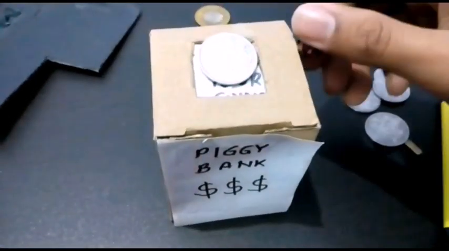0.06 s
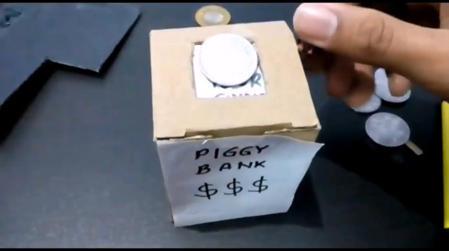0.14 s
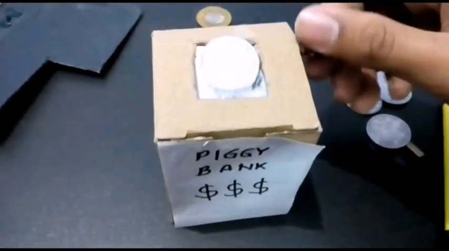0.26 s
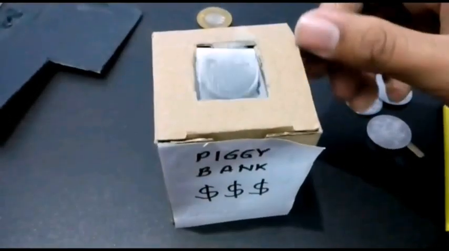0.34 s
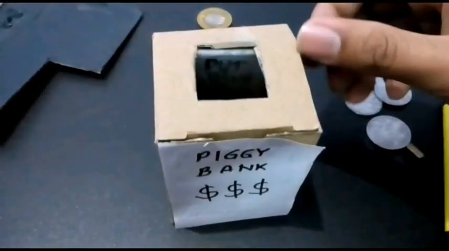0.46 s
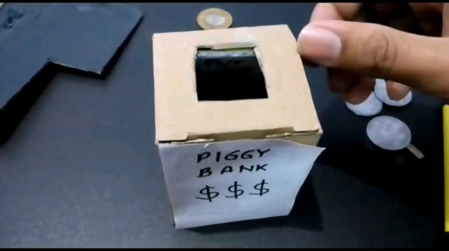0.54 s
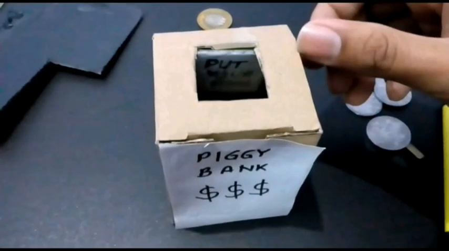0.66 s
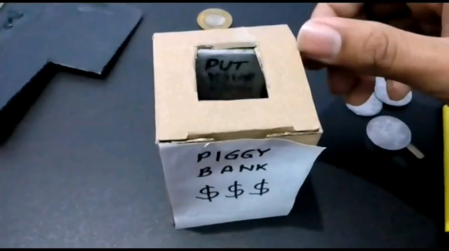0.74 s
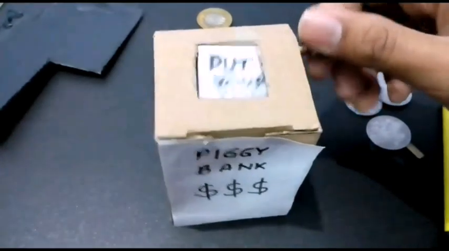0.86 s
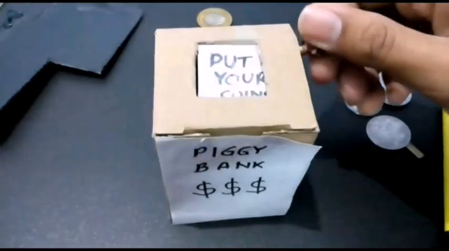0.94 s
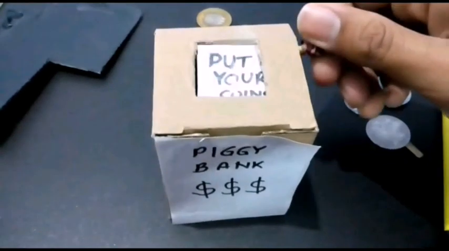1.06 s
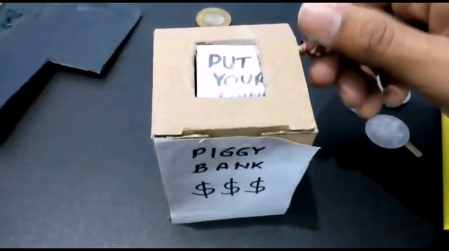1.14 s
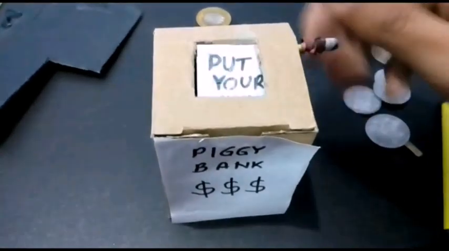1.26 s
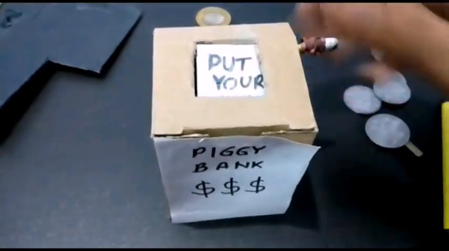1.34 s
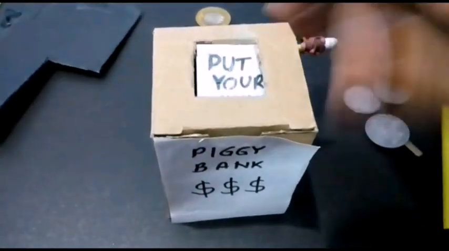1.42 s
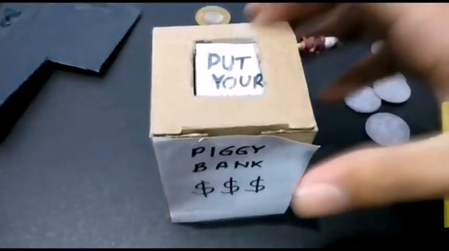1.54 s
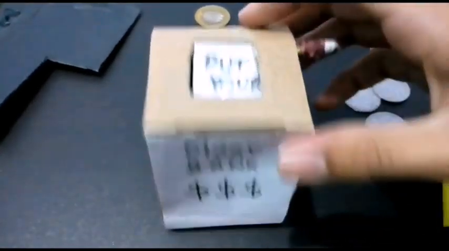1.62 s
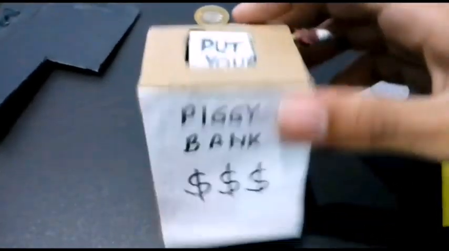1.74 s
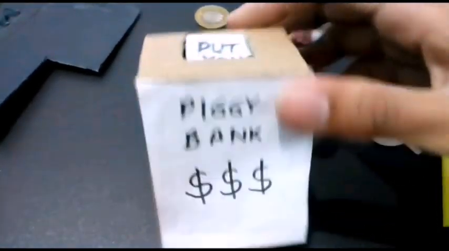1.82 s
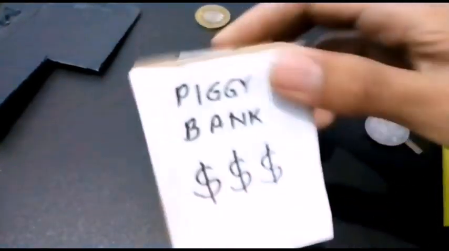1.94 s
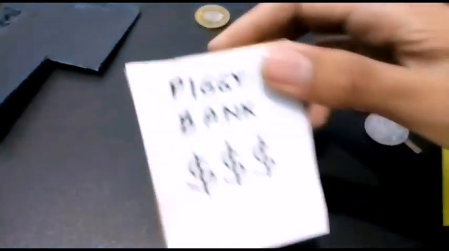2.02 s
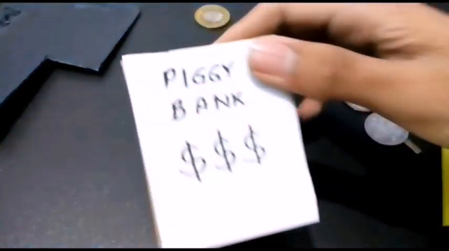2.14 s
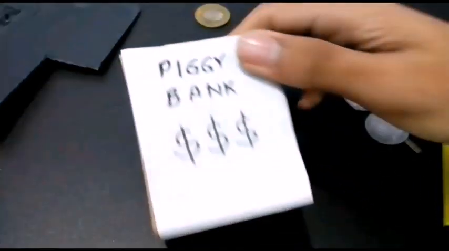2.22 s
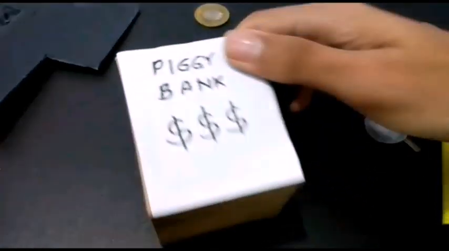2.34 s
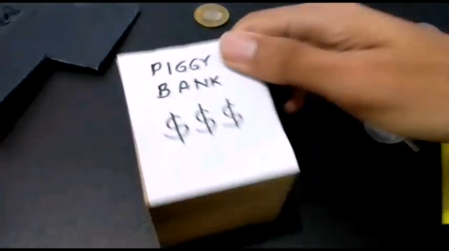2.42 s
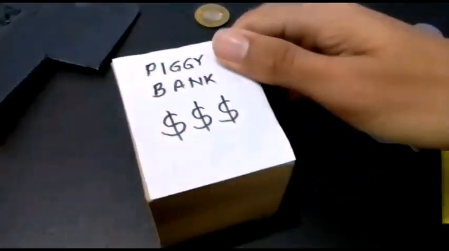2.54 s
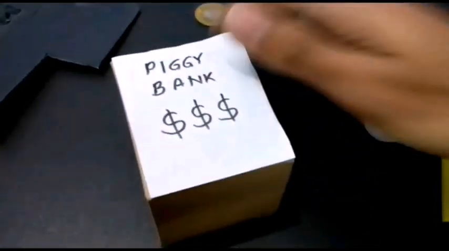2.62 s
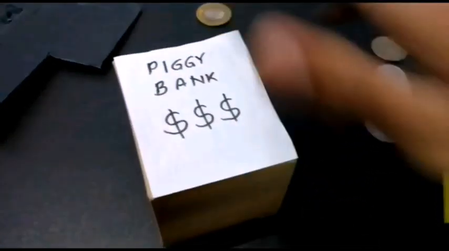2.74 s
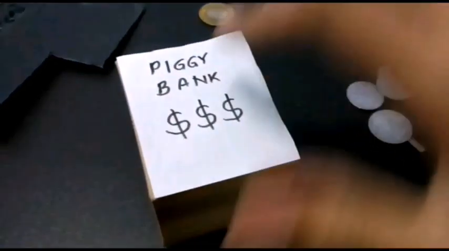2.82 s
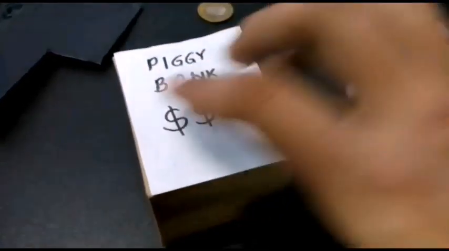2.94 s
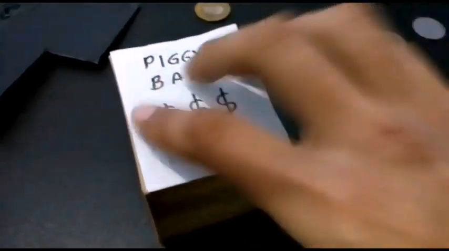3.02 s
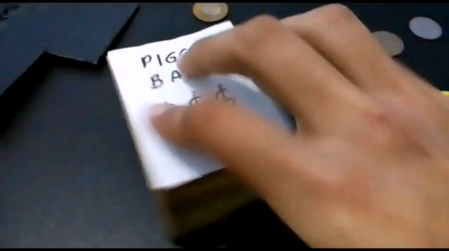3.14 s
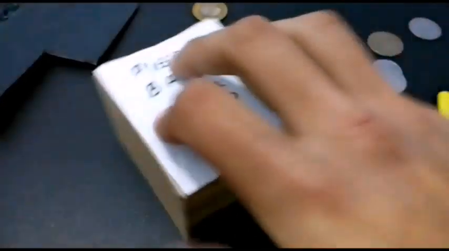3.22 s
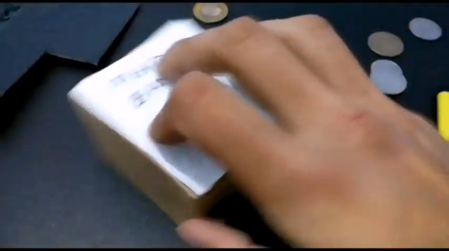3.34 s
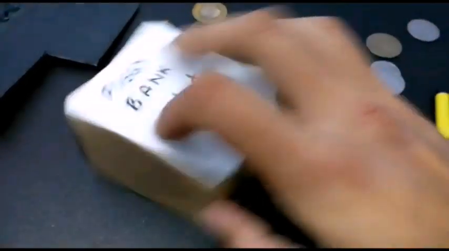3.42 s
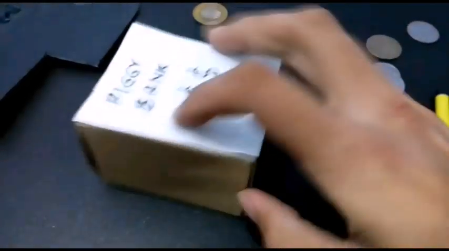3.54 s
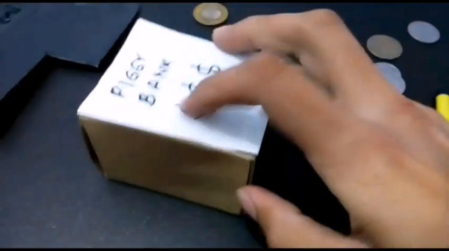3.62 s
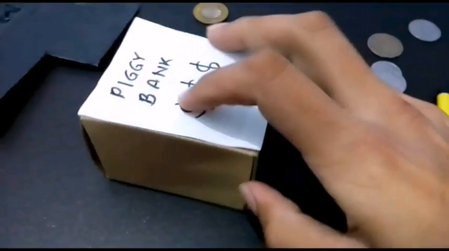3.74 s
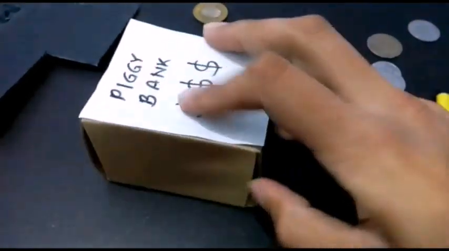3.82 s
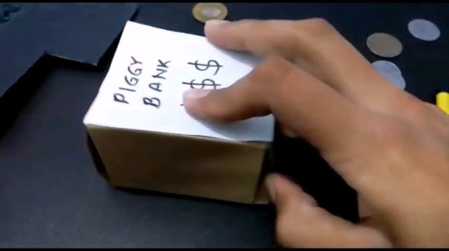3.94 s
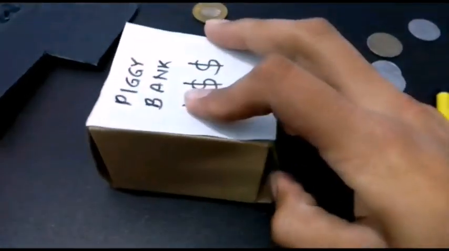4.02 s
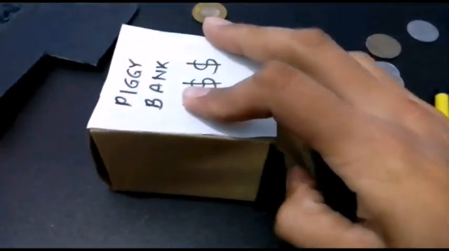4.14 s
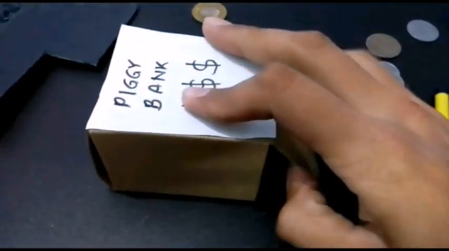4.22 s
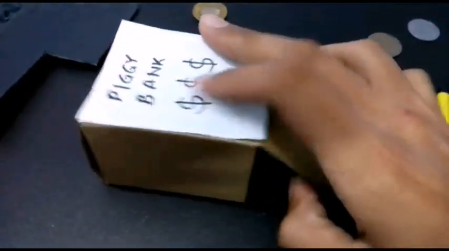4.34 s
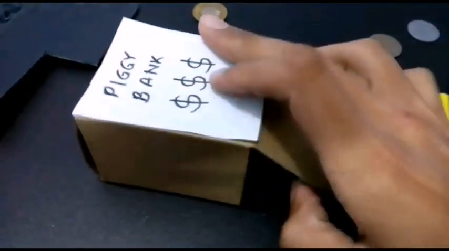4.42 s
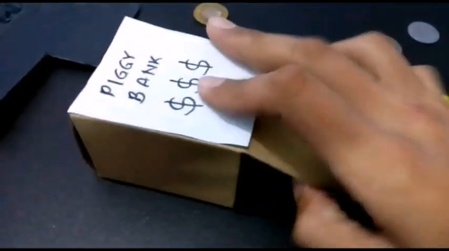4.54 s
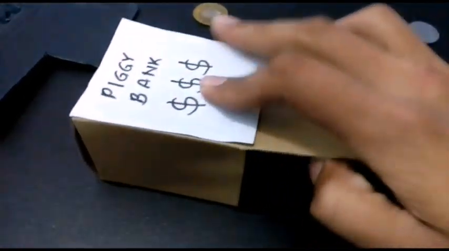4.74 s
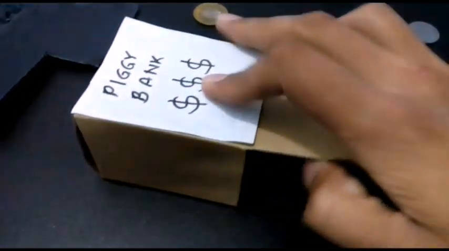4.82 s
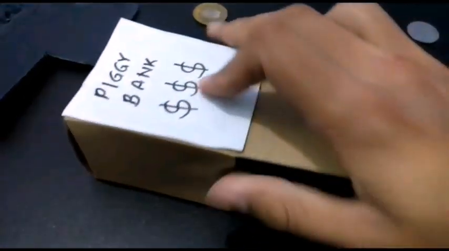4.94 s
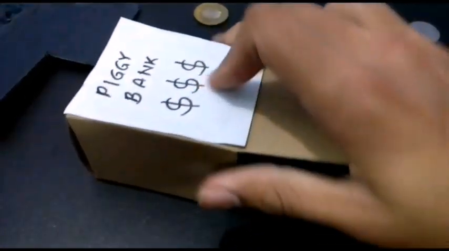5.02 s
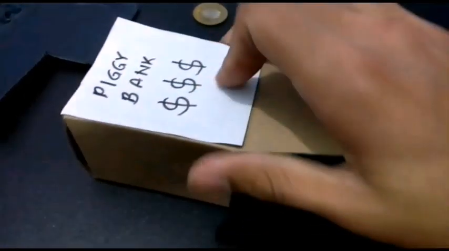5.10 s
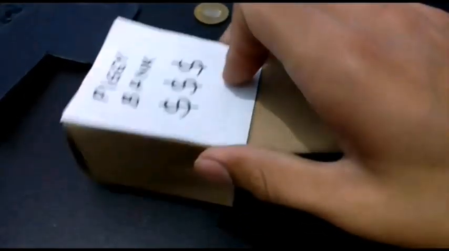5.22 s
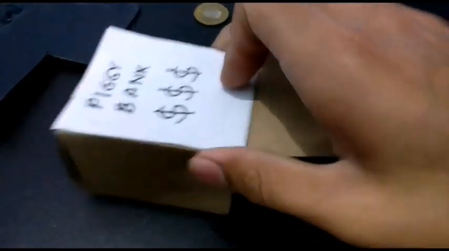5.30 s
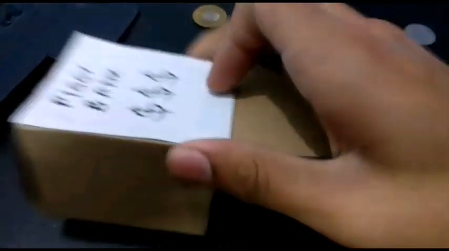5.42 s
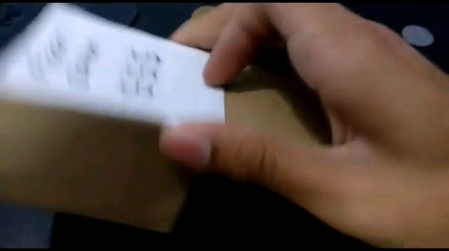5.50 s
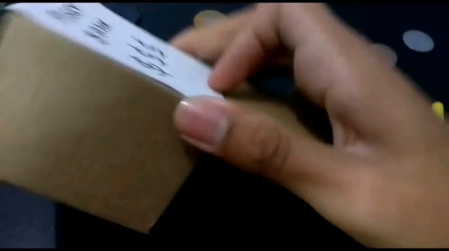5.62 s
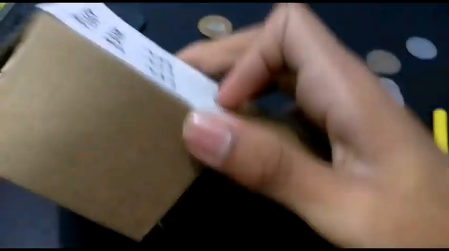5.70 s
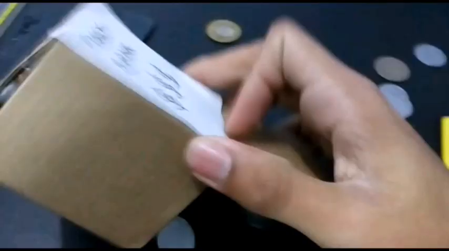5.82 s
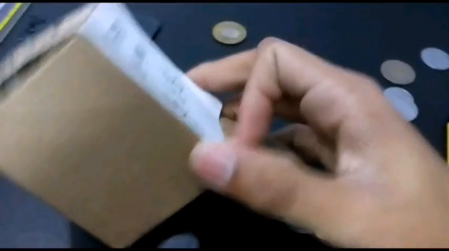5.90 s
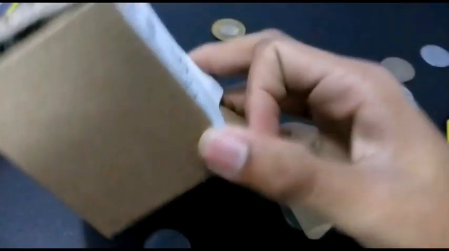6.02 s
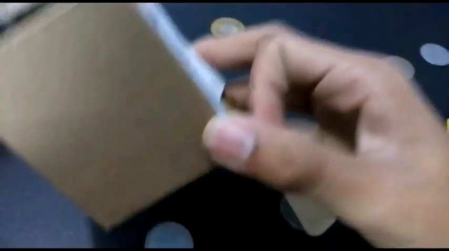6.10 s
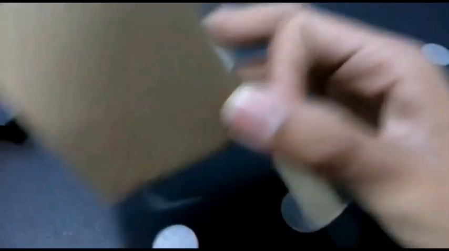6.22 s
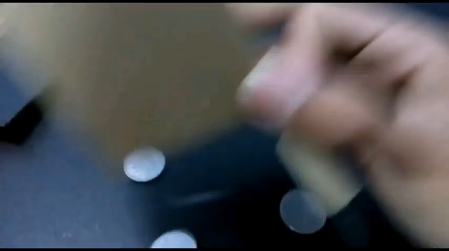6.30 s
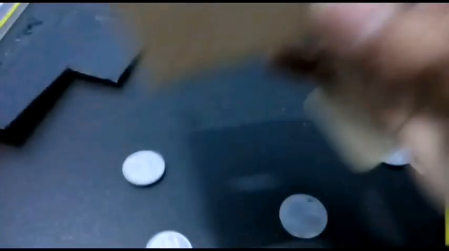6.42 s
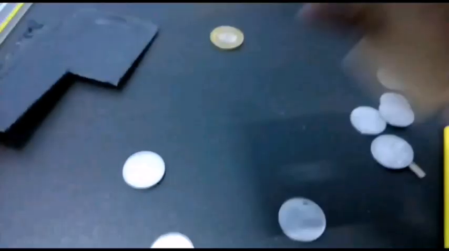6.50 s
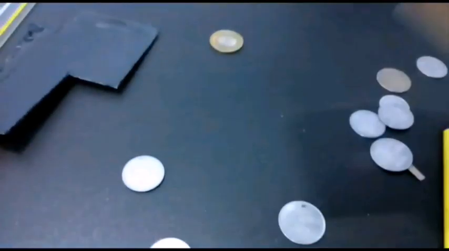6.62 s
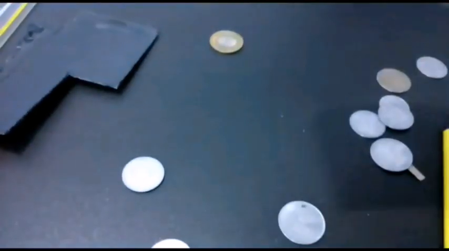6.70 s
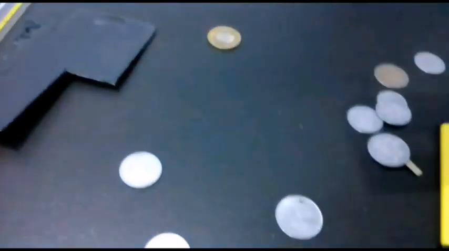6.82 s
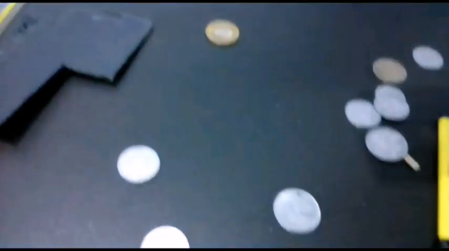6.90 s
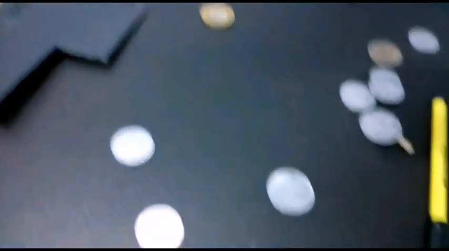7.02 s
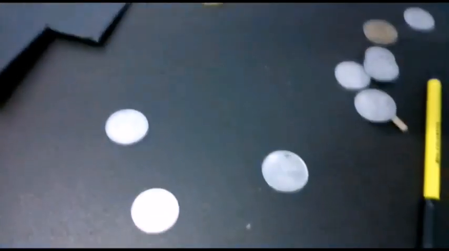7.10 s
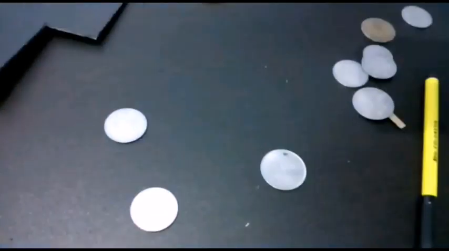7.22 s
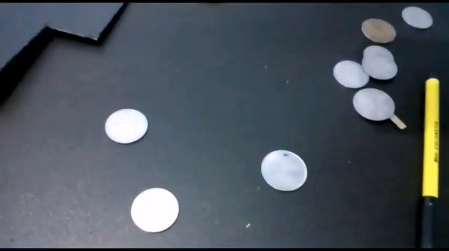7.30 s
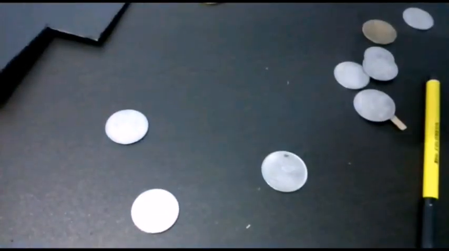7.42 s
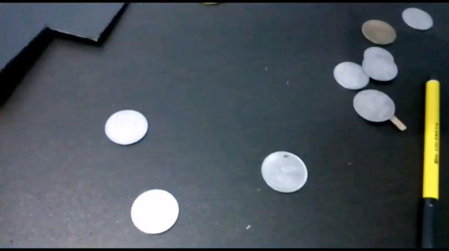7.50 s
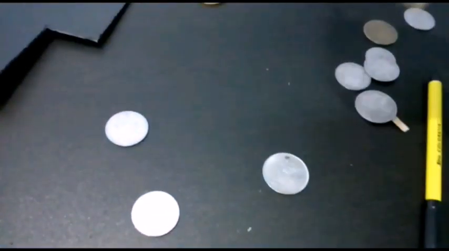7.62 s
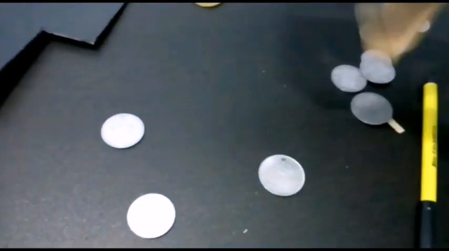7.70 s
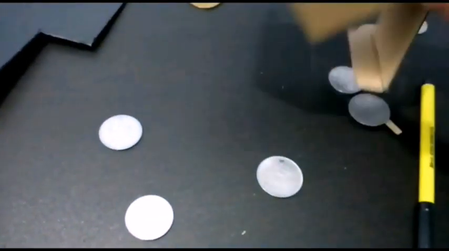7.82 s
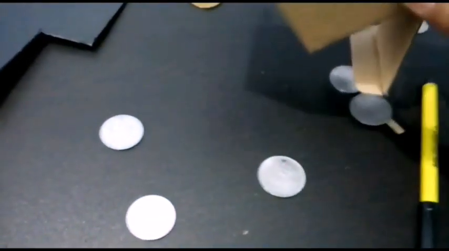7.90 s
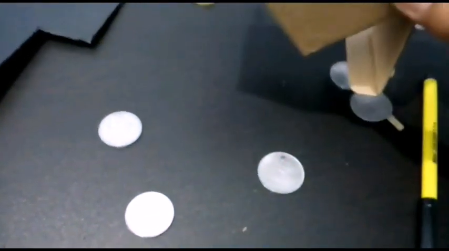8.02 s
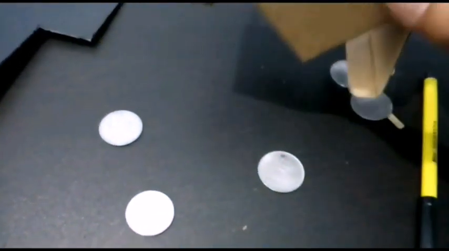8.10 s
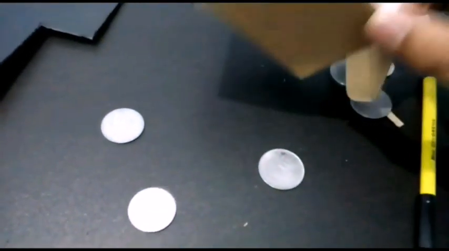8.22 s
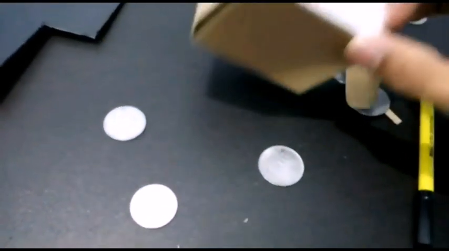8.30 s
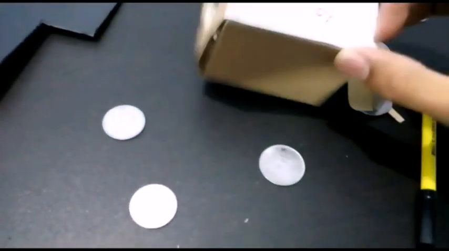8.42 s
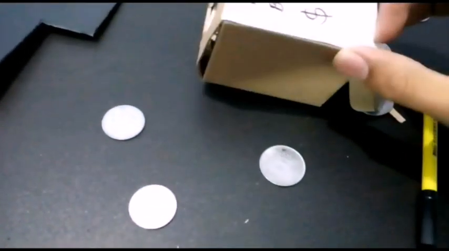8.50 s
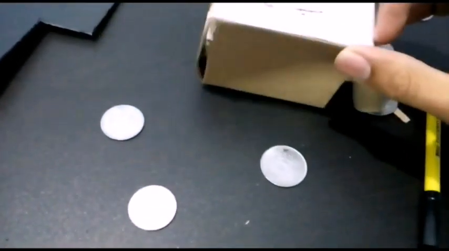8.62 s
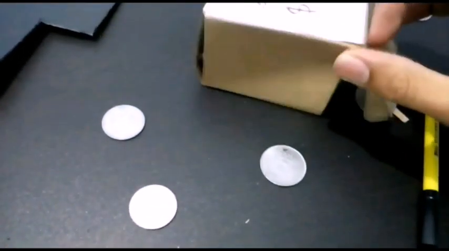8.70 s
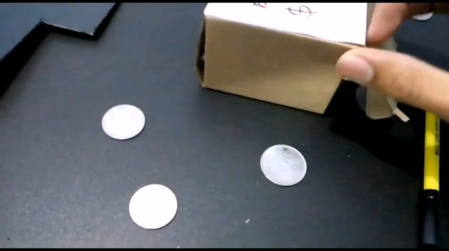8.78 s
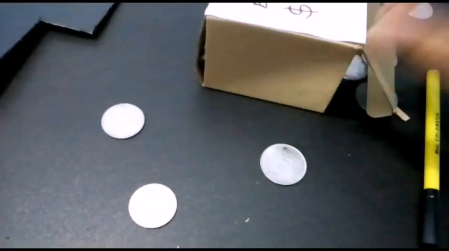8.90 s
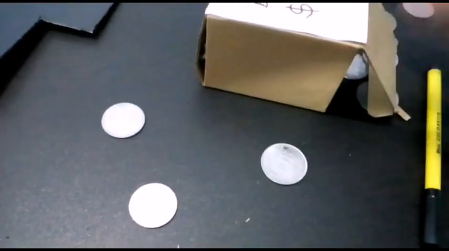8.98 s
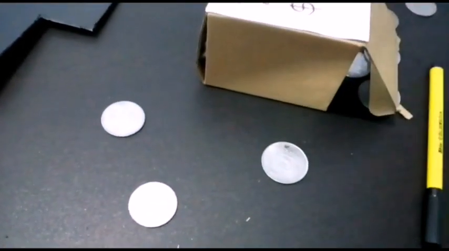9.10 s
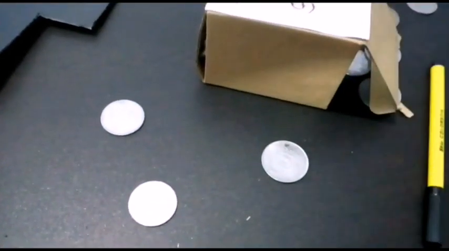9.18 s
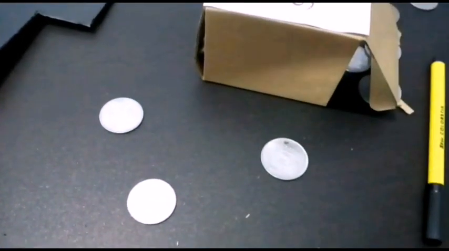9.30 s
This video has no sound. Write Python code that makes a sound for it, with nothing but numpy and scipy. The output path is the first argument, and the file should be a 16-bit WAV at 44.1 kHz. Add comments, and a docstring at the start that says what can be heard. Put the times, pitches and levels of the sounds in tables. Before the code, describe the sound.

Close by in a quiet room with a faint wavering hum, a coin clinks and knocks down into a cardboard box. Fingers rub and bump the box as it turns, rattling the coins inside, and a flap scrapes open. Then the coins fall ringing onto a tabletop, where they roll and wobble to a stop. Last, the box is set down with a hollow tap. Everything sits a little right of center.

```python
"""First a coin drops through a flap into a small cardboard box, knocking the walls and ringing.
Hands lift and tip the box, so the coins tumble inside, then turn and open it, scraping the card.
Near 6 s the coins spill on a hard table, where two wobble faster and faster until they lie flat.
A few last knocks and rubs follow. All along, the quiet room has a low wavering rumble.
The box stands nearer the right microphone."""
import sys
import numpy as np
from scipy import signal
from scipy.fft import rfft, irfft
from scipy.io import wavfile
from scipy.ndimage import uniform_filter1d

SR = 44100
rng = np.random.default_rng(int(sys.argv[2]) if len(sys.argv) > 2 else 0)


def file_out(sig):
    """Save sig as 16-bit WAV at sys.argv[1]."""
    # one column per channel
    cols = np.atleast_2d(sig).T
    # limit, then scale
    lim = np.clip(cols, -1, 1)
    pcm = np.round(lim * 32767).astype(np.int16)
    wavfile.write(sys.argv[1], SR, pcm)


N = 412321

# Tones of the box's walls and the air inside: pitch_hz, width_hz, level_db (narrow tones ring longer)
BOX_TONES = [(740, 21, -10), (1010, 62, -5.5), (1915, 96, 7), (2600, 99, 6.5), (3300, 34, 2.5),
             (3860, 110, -2), (4526, 1800, -8.5), (5600, 190, -24.5), (6400, 49, -19), (7273, 93, -24),
             (8515, 50, -59)]
# Low tones of the whole box on the table: pitch_hz, width_hz, level_db
THUD_TONES = [(190, 40, -3), (260, 35, 0), (350, 60, 0), (450, 40, -4)]
# How much low and high sound a crack holds: pitch_hz, level_db
CRACK_SPECTRUM = [(880, -28.5), (1500, -2.5), (2230, -4), (2970, -2), (5380, -8.5), (8240, -16.5),
                  (14900, -17), (16000, -15.5)]
# Each knock: start_s, level_db, pitch_hz, crack_db, thud_db (the last two add to level_db)
KNOCK_HITS = [(0.612, -48, 2350, 8.5, -30), (0.622, -34, 3700, 8, -22), (0.6335, -15, 1330, -0.5, -33),
              (0.683, -45, 1370, 0, -16.5), (0.695, -18.5, 1200, -2.5, -13), (0.731, -31, 1210, -10, -14),
              (0.774, -33.5, 1360, 7.5, -6.5), (0.812, -33, 1260, 9.5, -9), (1.096, -40.5, 474, -21.5, -31),
              (2.086, -40.5, 1240, 3.5, -58), (2.149, -24.5, 1390, -4, -3), (2.156, -22.5, 1380, 0, -5),
              (2.194, -34, 1120, -21, -18), (2.25, -28, 1660, -9.5, -17), (2.324, -35.5, 1350, -26, -9),
              (2.337, -39, 450, -18, 1), (2.587, -43.5, 1330, -10, -27.5), (2.637, -38.5, 750, -9, -4),
              (2.8, -31, 1037, -17, -13), (2.828, -23.5, 855, 13, -10.5), (2.874, -25.5, 1200, -10, -43.5),
              (2.887, -27, 710, 6, -15), (2.915, -26, 1020, 0, -8), (2.945, -30.5, 1040, -3.5, -14),
              (2.951, -15.5, 1810, 0, -21), (2.98, -23, 1190, -18, -11), (3.008, -17.5, 1960, -8.5, -20),
              (3.034, -24, 1970, -6, -15), (3.254, -37.5, 953, -12.5, -17.5), (3.254, -42, 3070, -11, -42),
              (3.515, -48, 990, -19, -33), (3.955, -47.5, 1000, -12, -30.5), (4, -44.5, 930, -25, -34),
              (4.112, -33, 1010, 11.5, -38), (4.197, -37, 3120, -1, -37.5), (4.215, -35.5, 970, 5.5, -45),
              (4.242, -42, 1070, 13.5, -38), (4.275, -22, 3420, -4, -9), (4.294, -23, 1050, 8, -43),
              (4.416, -42, 990, -9, -27), (4.548, -38.5, 1000, -14, -42), (5.398, -43, 900, 9.5, -22),
              (5.657, -33.5, 1510, -15.5, -31.5), (5.718, -16.5, 1910, -4.5, -31),
              (5.779, -33.5, 457, -14, -17), (5.813, -28, 464, 0, -9), (5.896, -9, 2900, -7.5, -22.5),
              (7.555, -35.5, 2160, 8.5, -52.5), (7.565, -39, 2050, 0, -50), (7.576, -42, 2060, -1, -48),
              (7.582, -48.5, 1215, 13, -48.5), (8.552, -48.5, 2430, 2.5, -38), (8.868, -30, 945, -6, -1),
              (8.877, -25, 1026, -16, -24), (8.893, -24.5, 2200, -20, -10.5), (8.965, -61, 2970, 12, -30)]
def knocks():
    """A short, rough touch shakes one wall and the whole box, with a bright crack and a low thud."""
    t, out = np.arange(SR // 8) / SR, np.zeros((2, N))
    contact_s = 0.0011
    # a coin rocks to rest in the box with eight fading taps
    rocking = [(3.108 + k * 0.017, -47 - 1.6 * k, 1900, -20, -50) for k in range(8)]
    box, crack, thud = resonator(BOX_TONES), tone_filter(CRACK_SPECTRUM), resonator(THUD_TONES)[0]
    for start_s, db, hz, crack_db, thud_db in KNOCK_HITS + rocking:
        direct, indirect = rng.standard_normal((2, len(t))) * t / contact_s * np.exp(-t / contact_s)
        direct[12] += 4.5  # one hard touch near the start
        # the far, left microphone hears the blow partly by other paths
        contact = np.array([0.69 * direct + 0.91 * indirect, direct])
        wall = (1 - np.exp(-t * hz)) * np.exp(-t * hz / 2.1) * np.sin(2 * np.pi * hz * t)
        parts = [(through(contact, wall), -1.5, 3),  # sound, left_db, right_db
                 (through(contact, box), -9 - hz / 250, -5 - hz / 250),
                 (through(contact, crack), crack_db - 7, crack_db + 8.5),
                 (through(contact[[1, 1]], thud), thud_db - 8.5, thud_db + 8.5)]
        for part, left_db, right_db in parts:
            part = part / abs(part).max(1, keepdims=True)
            add(out, start_s, stereo(db + left_db, db + right_db) * part)
    return out


# The tones of a coin: pitch_hz, level_db, ring_s (time to fade by 60 dB)
COIN_TONES = [(7180, -24, 0.044), (8195, -21, 0.029), (9930, -9, 0.035), (9950, -11, 0.097),
              (10530, -6.5, 0.066), (10870, -7, 0.08), (11250, -5, 0.15), (11460, -9.5, 0.096),
              (13700, -15, .04), (14320, -15, .04), (14700, -14, .07), (15230, -7.5, 0.086)]
def coin_ring(weights, ring_share):
    """Where a coin is hit sets how strong each tone is; what it lies on shortens the ring."""
    t = np.arange(SR // 4) / SR
    rise_s, detune = 0.00076, 0.002
    hz, db, ring_s = np.transpose(COIN_TONES)[..., None]
    hz = hz * (1 + detune * rng.standard_normal(hz.shape))  # each blow shifts the tones a little
    fade = gain_of(db - 60 * t / (ring_s * ring_share))
    ring = (weights[..., None] * fade * np.sin(2 * np.pi * hz * t)).sum(-2)
    ring *= 1 - np.exp(-t / rise_s)
    return ring / abs(ring).max()


# Each clink: start_s, level_db, ring_share (1 rings as long as a free coin)
CLINK_HITS = [(0.632, -20.5, 0.4), (0.683, -24.5, 0.33), (0.775, -19.5, 0.4), (0.814, -24.5, 0.19),
              (2.833, -33, 1), (2.952, -29.5, 0.35), (5.905, -21.5, 0.75), (5.9517, -23, 1)]
def clinks():
    """Struck coins ring, each with its own mix of tones."""
    out = np.zeros((2, N))
    for start_s, db, ring_share in CLINK_HITS:
        weights = rng.uniform(0.12, 1, (2, len(COIN_TONES)))
        add(out, start_s, stereo(db - 1.5, db + 8.5) * coin_ring(weights, ring_share))
    return out


# Tones of the table top: pitch_hz, width_hz, level_db
TABLE_TONES = [(449, 57, -1.5), (686.6, 54, -1.5), (1013, 37, -1.5), (1810, 56, -14.5), (2230, 25, -18.5),
               (2430, 160, -9), (3310, 100, -3), (4345, 78, -4), (6600, 188.8, -11.5), (6205, 140, -18),
               (8400, 31, -29)]
# Tones of the patches of table under a coin's rim: pitch_hz, level_db
PATCH_TONES = [(1050, -7), (1850, -10.5), (2750, -7), (3400, -5.5), (4450, -5.5), (5700, -8)]
# The lows and highs of rolling: pitch_hz, level_db
ROLL_SPECTRUM = [(88, -33), (150, -7.5), (303, -39.5), (448, -9), (871, -6.5), (998, -3.5), (2450, 0.5),
                 (3420, -3), (4490, -3.5), (9260, -22), (11300, -15), (16000, -37)]
# How loud the rolling is: time_s, level_db
ROLL_LEVELS = [(5.885, -66.5), (5.898, -30), (6.05, -31.5), (6.15, -38), (6.8, -36.5), (6.99, -38),
               (7.03, -52), (7.15, -76)]
# Landing skids, then the turns of two wobbling rims: time_s, level_db, decay_ms, pitch_hz
RIM_GRINDS = [(5.927, -24.5, 2.2, 3203), (5.942, -23.5, 3.3, 4785), (5.946, -27, 0.92, 4730),
              (5.956, -28, 6.1, 2620), (6.004, -31.5, 1.6, 3400), (6.041, -31, 6.7, 2520),
              (6.057, -28, 4.1, 3360), (6.079, -25, 2.3, 3410), (6.121, -32, 5.2, 3350),
              (6.132, -28.5, 4, 3287), (6.179, -27, 4.9, 2940), (6.201, -26.5, 2.3, 2670),
              (6.212, -33.5, 7.9, 2777), (6.273, -25.5, 5, 3223), (6.341, -27, 4.4, 3410),
              (6.356, -28, 3.1, 4900), (6.407, -30, 6, 3380), (6.434, -24, 2.8, 1750),
              (6.468, -27, 4.6, 2284), (6.506, -28, 2, 3170), (6.518, -29.5, 6, 4446),
              (6.575, -25.5, 4.8, 2936), (6.622, -34, 18, 3390), (6.636, -31, 2.9, 4400),
              (6.673, -28.5, 4, 4450), (6.693, -31, 3.1, 4680), (6.715, -30.5, 3.5, 3370),
              (6.747, -27, 2.6, 1900), (6.76, -26.5, 2.1, 1900), (6.782, -27, 1.7, 3350),
              (6.796, -25.5, 3.3, 3340), (6.829, -31.5, 5.2, 4460), (6.84, -29.5, 2.6, 3466),
              (6.858, -31, 4.1, 4480), (6.875, -29, 3, 4600), (6.886, -27.5, 1.3, 2490),
              (6.908, -28.5, 3, 4410), (6.938, -29, 3.2, 4380), (6.961, -34, 3.3, 2750),
              (6.98, -31, 2.6, 3460)]
def rolling_coins():
    """Coins roll on the table and grind it each time a tilted rim comes round."""
    t = np.arange(2000) / SR - 0.02
    width_hz, spread_db, peak_s = 260, 3.5, 0.002
    pressure, patches = follow([ROLL_LEVELS])[0], np.zeros((2, N))
    slips = friction(per_s=40000, spread_db=0.6)
    for time_s, db, decay_ms, hz in RIM_GRINDS:
        start_s = time_s + t[0]
        swell = gain_of(db) * np.exp(-abs(t - peak_s) / (decay_ms / 1000))
        add(pressure, start_s, swell)
        others = [(f, width_hz, level + spread_db * rng.standard_normal()) for f, level in PATCH_TONES]
        patch = resonator([(hz, width_hz, 0)] + others, size=512)  # the patch under the rim rings most
        grind = swell * slips[:, round(start_s * SR):][:, :len(t)]
        add(patches, start_s, through(grind, patch))
    force = pressure * slips
    table = 0.65 * through(force, tone_filter(ROLL_SPECTRUM))
    table += 0.32 * through(force, resonator(TABLE_TONES))
    table += 0.11 * through(force, resonator([(252, 25, 0)]))  # the whole top hums
    table += 0.029 * through(force, tone_filter(HISS_SPECTRUM))  # the rim hisses on the surface
    return (wander(table, depth_db=1.63, frames=3) + 0.9 * patches) * stereo(0.3, 5.2)


# How loud the jingle is, one curve for the drop and one for the spill: time_s, level_db
JINGLE_LEVELS = [
    [(.632, -60.5), (.65, -41), (.82, -53.5), (.87, -87)],
    [(5.81, -67.5), (5.89, -68), (5.91, -34.5), (6.05, -38), (6.2, -51.5), (6.7, -53.5), (6.98, -69),
     (7.04, -96.5)],
]
def jingle():
    """Tiny slips keep loose coins ringing as they slide."""
    ring = coin_ring(rng.choice([-1., 1.], (2, len(COIN_TONES))), ring_share=0.92)
    slips = follow(JINGLE_LEVELS)[0] * friction(per_s=3000, spread_db=2)
    coins = through(slips, ring / np.linalg.norm(ring[0]))
    return wander(coins, depth_db=2.8) * stereo(0.3, 5.2)


# The lows and highs of scraped cardboard, and of the hiss of sliding: pitch_hz, level_db
SCRAPE_SPECTRUM = [(180, -32), (260, -13.5), (346, -4.5), (633, -13), (1010, 0), (1200, -5.5), (2150, -10),
                   (2960, -11.5), (6500, -26.5), (8450, -36.5), (14300, -120)]
HISS_SPECTRUM = [(3240, -12), (5500, -3), (8190, -10), (9740, -6.5), (13400, -7), (15600, -19.5),
                 (16000, -24)]
# Coins slide inside the box, one curve for each tumble: time_s, scrape_db, hiss_db
COIN_TUMBLES = [
    [(0.624, -87.5, -72), (0.634, -59.5, -31), (0.659, -47, -52), (0.693, -35.5, -39), (0.748, -46.5, -62),
     (0.773, -36, -36.5), (0.818, -46.5, -43), (0.948, -98, -93)],
    [(2.819, -87, -86.5), (2.829, -22, -38), (2.842, -41, -59), (2.865, -39.5, -45), (2.883, -36, -38),
     (2.928, -46, -50.5), (3.02, -41.5, -44), (3.183, -96, -101)],
]
# Fingers and paper brush the box: peak_s, rise_s, fall_s, scrape_db, hiss_db
# (the scrape changes by 20 dB in rise_s or fall_s)
FINGER_STROKES = [(0.0, .1, 1, -67.5, -77), (0.549, 0.053, 0.027, -55.5, -62),
                  (0.609, 0.046, 0.0083, -50, -81), (1.093, 0.24, 0.043, -52.5, -72),
                  (1.367, .15, 0.1, -77.5, -98), (1.798, 0.033, 0.031, -50.5, -53),
                  (1.921, 0.11, 0.4, -85, -65), (2.15, 0.21, 0.18, -50.5, -62),
                  (2.335, 0.73, 0.04, -50.5, -70), (2.633, 0.06, 0.15, -49.5, -73),
                  (2.799, 0.042, 0.027, -54.5, -71), (3.37, 0.17, 0.097, -59, -65),
                  (3.702, 0.31, 0.26, -49, -63), (4.031, 0.04, 0.11, -62, -93),
                  (4.118, 0.062, 0.059, -32.5, -41.5), (4.242, 0.011, 0.094, -30.5, -43),
                  (4.286, 0.052, 0.039, -37, -34), (4.42, .12, .12, -53, -71.5),
                  (4.556, 0.092, 0.1, -48.5, -61.5), (4.734, 0.12, 0.12, -64, -81),
                  (4.869, 0.058, 0.034, -66.5, -80.5), (4.985, 0.0077, 0.096, -67, -82),
                  (5.083, 0.16, 0.098, -51.5, -56), (5.195, 0.0061, .01, -61, -81),
                  (5.223, 0.1, 0.44, -57, -81), (5.403, 0.011, 0.04, -41, -47),
                  (5.552, 0.14, 0.037, -44, -62), (5.718, 0.093, 0.25, -43, -66),
                  (5.821, 0.043, 0.1, -43.5, -45), (7.587, 0.032, 0.06, -56, -53),
                  (8.037, 0.035, 0.14, -70, -73), (8.551, 0.018, 0.32, -67, -83),
                  (8.88, 0.037, 0.067, -44.5, -52), (9.044, .05, .04, -79, -75)]
def rubbing():
    """Fingers and coins scrape the card and boom in the hollow box; skin on paper adds a smooth hiss."""
    t, strokes = np.arange(-SR, SR) / SR, np.zeros((2, N + SR))
    for peak_s, rise_s, fall_s, scrape_db, hiss_db in FINGER_STROKES:
        drop_db = 20 * np.maximum(-t / rise_s, t / fall_s)
        add(strokes, peak_s, gain_of([scrape_db - drop_db, hiss_db - 1.36 * drop_db]))  # hiss is quicker
    scrape_gain, hiss_gain = strokes[:, SR:] + follow(COIN_TUMBLES)
    slips = friction(per_s=6000, spread_db=2.6)
    card = through(slips, tone_filter(SCRAPE_SPECTRUM))
    card += 0.28 * through(slips, resonator(BOX_TONES))
    card += 0.24 * through(slips, resonator(THUD_TONES))
    skin = through(friction(per_s=20000, spread_db=1.5), tone_filter(HISS_SPECTRUM))
    scrape = scrape_gain * wander(unit_level(card), depth_db=4.2)
    hiss = hiss_gain * wander(skin, depth_db=3.2)
    return (scrape + hiss) * stereo(-3.9, 3.1)


# How long the room rings: pitch_hz, ring_s (time to fade by 60 dB)
ECHO_TIMES = [(200, 0.3), (1000, 0.15), (4000, 0.024), (12000, 0.15)]
def room_echo(sound):
    """Many small echoes come back from the room, each pitch dying at its own speed."""
    echoes = np.zeros((2, SR // 2))
    arrivals = np.arange(120, SR // 2 - 20, 20) + rng.integers(0, 20, (2, (SR // 2 - 121) // 20))
    np.put_along_axis(echoes, arrivals, rng.choice([-1., 1.], arrivals.shape), 1)
    hz, t, bands = signal.stft(echoes, SR, nperseg=128)
    fade = gain_of(-60 * t / at_pitch(ECHO_TIMES, hz)[:, None])
    tail = signal.istft(bands * fade, SR, nperseg=128)[1]
    return through(np.array([sound, sound]), tail / np.linalg.norm(tail[0]))


# The room's low tones, in four groups: pitch_hz, width_hz, level_db
ROOM_TONES = [
    [(85, 9, 0), (70, 30, -6)],
    [(120, 9, 0)],
    [(135, 8, 0)],
    [(115, 110, 0)],
]
# Each group's share of the rumble: level_db
GROUP_LEVELS = [-2.5, -3.5, -3.5, 0.5]
# How loud the rumble is: time_s, level_db
RUMBLE_LEVELS = [(0, -65.5), (.26, -65.5), (0.571, -71.5), (.72, -56.5), (1.07, -70.5), (1.95, -66),
                 (3, -60), (3.85, -65.5), (4.82, -65.5), (5.5, -54.5), (7.15, -58.5), (7.34, -70),
                 (8.7, -80.5), (8.9, -69), (9.35, -87)]
def rumble():
    """Noise rings the room's low tones, nearly the same at both microphones."""
    out, level = 0, follow([RUMBLE_LEVELS])[0]
    for db, tones in zip(GROUP_LEVELS, ROOM_TONES):
        shared, side = rng.standard_normal((2, N))
        noise = np.array([shared + 0.26 * side, shared - 0.32 * side])
        ring = resonator(tones, size=16384)[0]
        out += gain_of(db) * level * unit_level(through(through(noise, ring), ring))
    return out


# Each swell of low hum: start_s, length_s, pitch_hz, level_db
HUM_SWELLS = [(.15, .25, 115, -61), (.6, .25, 75, -57), (2.2, .68, 83, -56.5), (2.86, .28, 76, -55),
              (3.12, .58, 85, -59.5), (3.32, .42, 133, -62), (3.6, .78, 120, -65), (4.98, .36, 136, -52),
              (5.21, .75, 85, -51.5), (5.33, .6, 136, -51), (5.96, .24, 87, -56), (6.08, .15, 136, -52),
              (6.17, .48, 122, -51), (6.28, .3, 137, -57), (6.96, .33, 120, -51)]
def hum():
    """Low tones swell and fade while their pitch wavers."""
    out, waver_hz = np.zeros((2, N)), 1.2
    for start_s, length_s, hz, db in HUM_SWELLS:
        swell = np.hanning(round(length_s * SR)) ** 0.35
        waver = unit_level(uniform_filter1d(rng.standard_normal(SR), size=6000))[:len(swell)]
        cycles = np.cumsum(hz + waver_hz * waver) / SR + rng.random()
        left_shift = [[0.05 * rng.standard_normal()], [0]]
        tone = np.sqrt(2) * np.sin(2 * np.pi * (cycles + left_shift))
        add(out, start_s, stereo(db - 0.5, db) * swell * tone)
    return out


# The lows and highs of the background noise: pitch_hz, level_db
AIR_SPECTRUM = [(12, -47), (20, -19.5), (120, -1.5), (187, -6.5), (241, -17.5), (388, -13.5), (825, -25),
                (1120, -22.5), (1810, -28.5), (2260, -26.5), (3530, -27), (13500, -35.5), (16000, -50.5)]
# How alike left and right are: pitch_hz, likeness (1 is the same, 0 is unrelated)
AIR_LIKENESS = [(60, 0.74), (240, 0.7), (950, 0.08), (3770, 0.0), (15000, -0.04)]
def air():
    """The steady sound of the quiet room, plus microphone hiss."""
    hz = np.fft.rfftfreq(N, 1 / SR)
    left, other = rfft(rng.standard_normal((2, N)))
    likeness = at_pitch(AIR_LIKENESS, hz)
    right = likeness * left + np.sqrt(1 - likeness ** 2) * other
    spectrum = np.array([left, right]) * gain_of(at_pitch(AIR_SPECTRUM, hz))
    return gain_of(-70.5) * unit_level(irfft(spectrum, N))


def friction(per_s, spread_db):
    """Sliding is many tiny slips of uneven size, timed alike at both microphones."""
    sizes = gain_of(spread_db * np.minimum(rng.exponential(1, N), 5))
    slips = sizes * (rng.random(N) < per_s / SR)
    noise, shared = rng.standard_normal((3, N)), 0.46  # the share both microphones hear alike
    return unit_level(slips * (np.sqrt(shared) * noise[0] + np.sqrt(1 - shared) * noise[1:]))


def wander(sound, depth_db, frames=8):
    """The touching point moves about, so tones swell and fade in patches."""
    bands = signal.stft(sound, nperseg=512)[2]
    patches = uniform_filter1d(rng.standard_normal(bands.shape), size=4, axis=1)  # smooth over pitch
    patches = uniform_filter1d(patches, size=frames, axis=2)  # and over time
    moved = signal.istft(bands * gain_of(depth_db * unit_level(patches)), nperseg=512)[1][:, :N]
    return moved * np.linalg.norm(sound) / np.linalg.norm(moved)


def resonator(tones, size=4096):
    """How an object rings after one tap; each microphone catches the waves at a different point."""
    t = np.arange(size) / SR
    hz, width, db = np.transpose(tones)[..., None]
    fades = gain_of(db) * width * np.exp(-np.pi * width * t)
    phases = rng.random((2, *hz.shape))
    ring = (fades * np.sin(2 * np.pi * (hz * t + phases))).sum(1)
    return ring / np.linalg.norm(ring, axis=1).mean()


def tone_filter(spectrum):
    """The quickest click with the given lows and highs (a minimum-phase filter)."""
    hz = abs(np.fft.fftfreq(4096, 1 / SR))
    log_gain = np.log(gain_of(np.maximum(at_pitch(spectrum, hz), -100)))
    click = np.fft.ifft(np.exp(np.conj(signal.hilbert(log_gain)))).real[:2048]
    return click / np.linalg.norm(click)


def through(sound, response):
    """Plays each channel through a filter or a ringing object."""
    return signal.oaconvolve(sound, np.atleast_2d(response), axes=1)[:, :sound.shape[1]]


def follow(curves):
    """Joins dB curves into one gain track per column, silent outside them."""
    t, out = np.arange(N) / SR, 0
    for rows in curves:
        times, *columns = np.transpose(rows)
        active = (t >= times[0]) & (t < times[-1])
        out += gain_of([np.interp(t, times, db) for db in columns]) * active
    return out


def at_pitch(points, hz):
    """Looks up a curve between its listed pitches, on a log scale."""
    pitches, values = np.transpose(points)
    return np.interp(np.log(hz + 1), np.log(pitches + 1), values)


def add(mix, start_s, sound):
    """Mixes a sound in at start_s."""
    part = mix[..., round(start_s * SR):][..., :sound.shape[-1]]
    part += sound[..., :part.shape[-1]]


def gain_of(db):
    """Turns decibels into a number to multiply by."""
    return 10 ** (np.asarray(db) / 20)


def stereo(left_db, right_db):
    """One gain for each microphone."""
    return gain_of([[left_db], [right_db]])


def unit_level(sound):
    """Scales the average level (rms) to 1."""
    return sound / np.sqrt(np.mean(sound ** 2) + 1e-20)


def scene():
    """Near sounds reach the left microphone a little later; the room answers them."""
    near = knocks() + clinks() + rubbing() + rolling_coins() + jingle()
    near[0] = np.roll(near[0], 10)
    heard = near + stereo(-13, -11) * room_echo(near[1])
    low = signal.sosfiltfilt(signal.butter(2, 520, fs=SR, output="sos"), heard)
    alike = 0.53 * low.mean(0)  # long waves arrive alike at both microphones
    return heard - low + alike + rumble() + hum() + air()


def record(dry):
    """The microphones lose the deepest bass; the highest treble is cut too."""
    thin = signal.sosfilt(signal.butter(2, 45, "high", fs=SR, output="sos"), dry)
    treble_cut = signal.firwin(511, 15700, window=("kaiser", 9), fs=SR)
    return signal.oaconvolve(thin, treble_cut[None], "same")


dry = scene()
out = record(dry)
file_out(out)
```